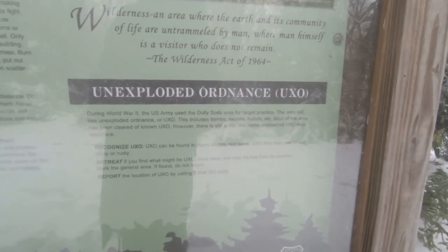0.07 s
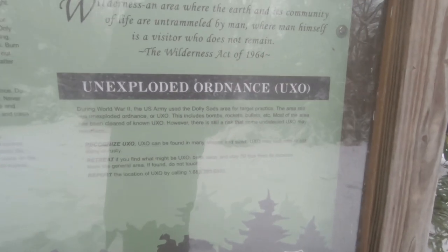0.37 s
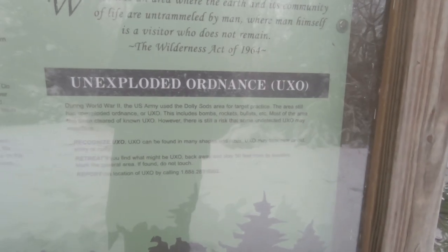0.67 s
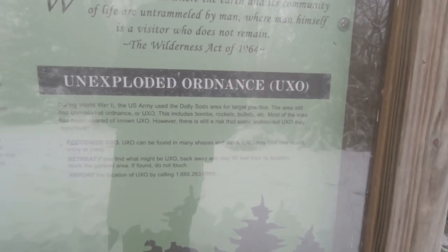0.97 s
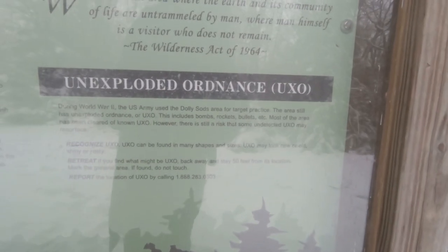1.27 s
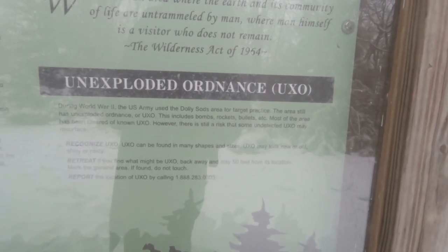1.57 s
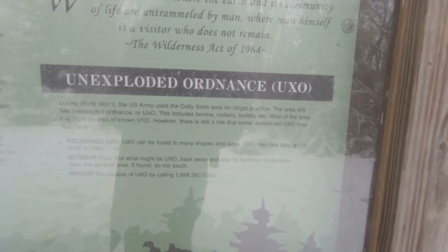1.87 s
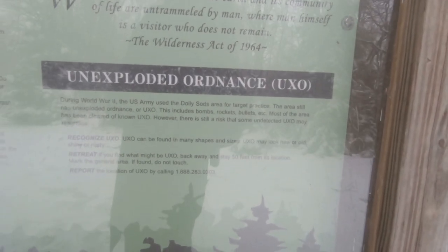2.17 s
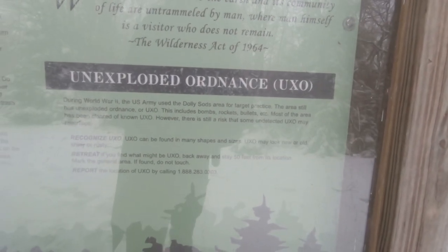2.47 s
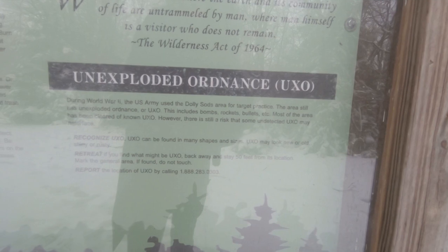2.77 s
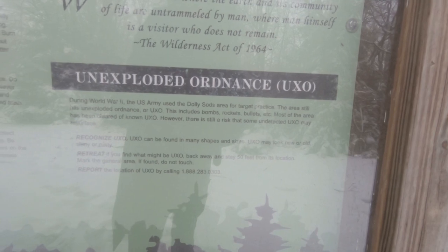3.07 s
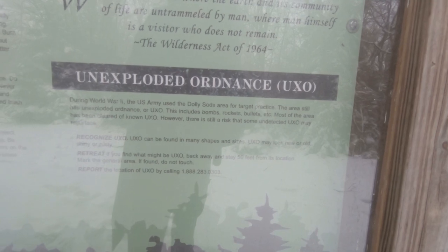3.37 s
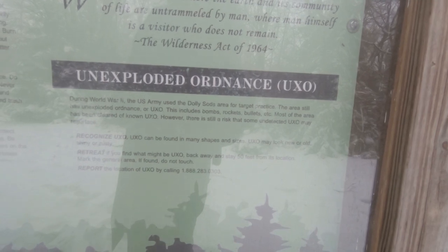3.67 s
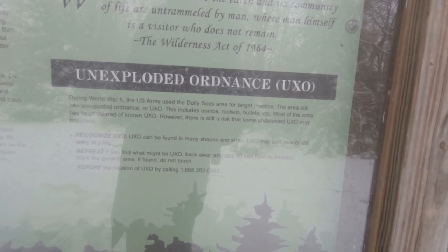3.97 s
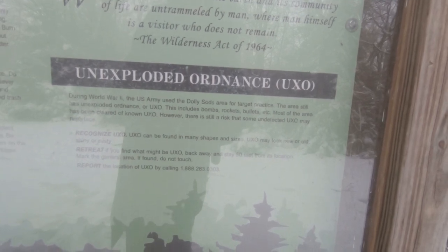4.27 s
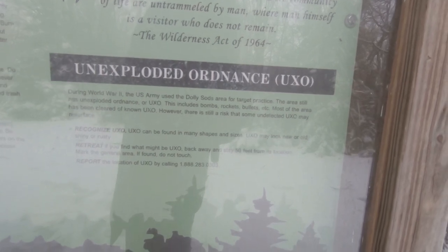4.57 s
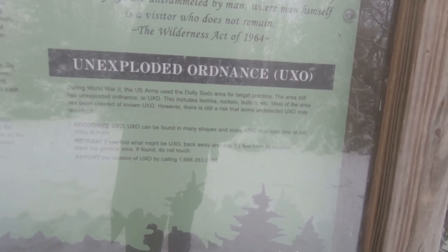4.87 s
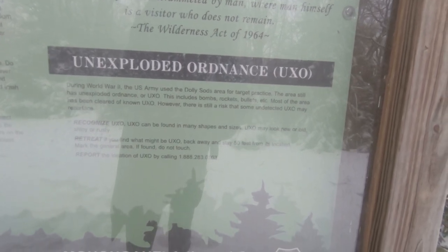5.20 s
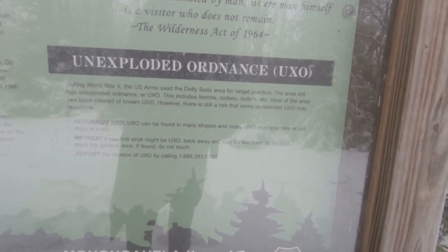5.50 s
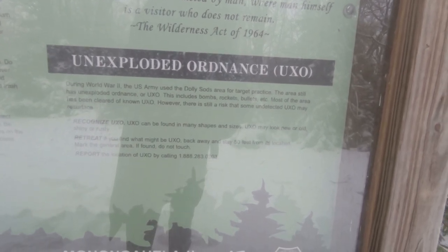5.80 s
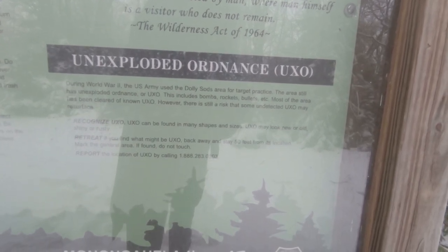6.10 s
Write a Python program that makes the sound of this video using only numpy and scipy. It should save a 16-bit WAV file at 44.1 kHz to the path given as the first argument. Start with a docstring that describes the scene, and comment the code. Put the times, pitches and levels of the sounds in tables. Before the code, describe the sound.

From the start, a faint low roar of wind comes from a distant forest, branches hiss softly ahead, and fine freezing rain patters all around. A brief gust rumbles on the microphone right away, and dull close taps sound at about 0.1 and 0.7 seconds. Around 1.5 to 2 seconds the sound widens from mono to stereo. From 2 seconds, uneven gusts thump the microphone, mostly on the right, while nearby ice pellets tick with brittle clicks. A sharper tap comes near 3 seconds. Between 3.5 and 4.2 seconds, several drops splat dryly on a wooden sign at left, as the far roar sinks away. A few more taps follow from 4.6 to 5.3 seconds. At about 5 seconds the strongest gusts arrive, a loud low buffeting over the ticking ice, which holds and then eases around 6 seconds.

```python
"""Wind and light freezing rain at a wooden trail sign, on the two microphone ports of a hand-held camera.
From the start the forest roars far off, branches hiss ahead and ice grains patter all around.
A first gust buffets each port on its own, dull taps sound close by and near pellets tick.
After about 1.4 s the image opens from mono to stereo; from 3.5 s a few drops splat on the sign at left.
The roar sinks away, and near 5 s the strongest gusts rise, hold and die away over a light breeze."""
import sys
import numpy as np
from scipy import signal
from scipy.fft import rfft, irfft, next_fast_len
from scipy.io import wavfile
from scipy.ndimage import uniform_filter1d, map_coordinates

SR = 44100
rng = np.random.default_rng(int(sys.argv[2]) if len(sys.argv) > 2 else 0)


def log_audio(samples):
    """Write samples as a 16-bit WAV file to the path given in sys.argv[1]."""
    # one column per channel
    frames = np.atleast_2d(samples).T
    # limit to full scale, then quantise
    limited = np.clip(frames, -1, 1)
    pcm = np.round(limited * 32767).astype(np.int16)
    wavfile.write(sys.argv[1], SR, pcm)


N = 270774


def amp(db):
    """Decibels to gain."""
    return 10 ** (np.asarray(db) / 20)


def unit(x):
    """Scaled to rms 1."""
    return x / np.sqrt(np.mean(x ** 2) + 1e-20)


def along(points, hz):
    """Gain of (frequency [Hz], level [dB]) points on a log axis."""
    f, db = np.transpose(points)
    return amp(np.interp(np.log(hz + 1), np.log(f + 1), db))


def curve(points):
    """One level per sample from (time [s], level [dB]) points."""
    s, db = np.transpose(points)
    return np.interp(np.arange(N) / SR, s, db)


def wobble(rate):
    """A smooth random curve, rate knots a second."""
    knots = rng.standard_normal(int(N * rate / SR) + 4)
    return map_coordinates(knots, [np.arange(N) * rate / SR])


def filtered(x, response):
    """x times a response of frequency."""
    m = next_fast_len(N + SR // 2)
    return irfft(rfft(x, m) * response(np.fft.rfftfreq(m, 1 / SR)), m)[..., :N]


def rush(spectrum, patchy_db):
    """Coloured noise of rms 1 with patches of random gain in frequency and time."""
    cells = signal.stft(rng.standard_normal(N), nperseg=512)[2]
    patches = uniform_filter1d(rng.standard_normal(cells.shape), size=7, axis=0)
    patches = uniform_filter1d(patches, size=14, axis=1)
    noise = signal.istft(cells * amp(patchy_db * unit(patches)), nperseg=512)[1][:N]
    return unit(filtered(noise, lambda hz: along(spectrum, hz)))


def stereo(mid, side):
    """Left and right from mid and side."""
    return np.array([mid + side, mid - side])


def panned(pan_db):
    """Left and right gains whose powers add to 1."""
    gains = amp(np.array([np.atleast_1d(pan_db), -np.atleast_1d(pan_db)]) / 2)
    return gains / np.linalg.norm(gains, axis=0)


def add(out, s, sound):
    """Mix a short stereo sound in at time s."""
    part = out[:, max(round(s * SR), 0):][:, :sound.shape[1]]
    part += sound[:, :part.shape[1]]


# far roar of the forest: (time [s], level [dB])
ROAR_LEVELS = [(0, -51.5), (0.7, -53.5), (1.3, -49), (2.1, -51), (3.0, -57), (3.8, -59.5), (4.4, -59.5),
               (6.14, -69)]
# its colour: (frequency [Hz], level [dB])
ROAR_SPECTRUM = [(30, -22), (110, -10), (145, 0), (175, 3.5), (215, -4), (280, -10.5), (400, -20.5),
                 (700, -59.5)]
# wind in the branches ahead: (time [s], relative level [dB])
WIND_LEVELS = [(0.1, -54.5), (0.46, -54), (1.01, -55), (1.28, -54), (1.82, -56), (2.02, -57.5), (2.39, -59),
               (3.46, -60.5), (4.16, -59), (4.44, -60), (5.09, -58), (5.4, -61.5), (6.05, -61)]
# hiss of the branches: (frequency [Hz], level [dB])
BRANCH_SPECTRUM = [(150, -3), (350, -3), (700, -1.5), (950, -7.5), (1300, -4.5), (2000, -3), (3200, 0),
                   (4000, -2.5), (4800, -6), (5600, -20.5), (8000, -58), (15000, -70)]
# width of that hiss around the microphone: (frequency [Hz], side gain [dB])
BRANCH_WIDTH = [(350, -15), (750, -2.5), (1500, -3), (2200, -5), (3300, -9), (4500, -11.5)]


def forest():
    """A far low roar and the hiss of wind in the branches ahead; the woods all around stay steady."""
    roar = amp(curve(ROAR_LEVELS) + 0.7 * wobble(5.0)) * rush(ROAR_SPECTRUM, patchy_db=2.0)
    ahead = rush(BRANCH_SPECTRUM, patchy_db=0.94) * amp(curve(WIND_LEVELS) + 1.5 + 0.55 * wobble(23.9))
    around_gain = amp(-57.0 + 0.27 * wobble(3))
    around = filtered(rush(BRANCH_SPECTRUM, patchy_db=1.2), lambda hz: along(BRANCH_WIDTH, hz))
    return stereo(roar + ahead, around_gain * around)


def patter(spectrum, per_s, scatter_db):
    """Tiny ice grains of uneven size, unrelated at the two ports, rms 1."""
    shape = (2, N)
    hits = (rng.random(shape) < per_s / SR) * rng.choice([-1, 1], shape)
    sizes = amp(scatter_db * np.minimum(rng.standard_normal(shape), 2))
    return unit(filtered(hits * sizes, lambda hz: along(spectrum, hz)))


# sleet falling all around: (time [s], relative level [dB])
SLEET_LEVELS = [(0.1, -71), (0.36, -70), (1.61, -69.5), (2.35, -66), (2.5, -64.5), (3.38, -66.5),
                (5.17, -61.5), (5.83, -64.5), (6.05, -64.5)]
# its colour: (frequency [Hz], level [dB])
SLEET_SPECTRUM = [(2000, -17), (4000, -14.5), (5200, 3), (6300, 2.5), (7500, 2.5), (8300, -4), (9300, -11),
                  (10500, -16), (12500, -39), (14800, -59)]
# fine ice fizz on top: (time [s], relative level [dB])
FIZZ_LEVELS = [(0.1, -83), (0.28, -81.5), (1.41, -82.5), (1.54, -85), (2.39, -84.5), (2.53, -83),
               (3.35, -95), (4.24, -92), (5.19, -85.5), (5.77, -94), (6.05, -91)]
# its colour: (frequency [Hz], level [dB])
FIZZ_SPECTRUM = [(5000, -23), (8000, 9.5), (9500, 0), (11300, 2.5), (12800, -2), (13800, -14), (14800, -27)]


def sleet():
    """Far grains merge into a hiss; nearer ones stay a crackle with a fine fizz on top."""
    flurry = wobble(14)
    far = stereo(rush(SLEET_SPECTRUM, patchy_db=1.2), amp(-0.5) * rush(SLEET_SPECTRUM, patchy_db=1.0))
    near = patter(SLEET_SPECTRUM, per_s=180, scatter_db=6.5)
    fizz = stereo(rush(FIZZ_SPECTRUM, patchy_db=2.5), rush(FIZZ_SPECTRUM, patchy_db=1))
    fizz += amp(-6.0) * patter(FIZZ_SPECTRUM, per_s=55, scatter_db=11.0)
    sleet_gain = amp(curve(SLEET_LEVELS) + 0.3 * flurry)
    fizz_gain = amp(curve(FIZZ_LEVELS) + 3.5 + 1.9 * flurry)
    return sleet_gain * (amp(-0.57) * far + amp(-4.5) * near) + fizz_gain * fizz


# rumble of air right on a microphone port: (frequency [Hz], level [dB])
RUMBLE_SPECTRUM = [(10, -27), (25, -3.5), (45, 0), (70, 0), (100, -6), (150, -12.5), (220, -27.5),
                   (320, -44.5), (480, -58.5), (900, -67), (2000, -100)]
# finer flutter at the port: (frequency [Hz], level [dB])
FLUTTER_SPECTRUM = [(60, -16), (130, 2), (220, -0.5), (320, -14), (480, -25.5), (900, -60), (2000, -80)]


def port_turbulence():
    """Lumpy turbulence of rms 1; each pressure peak sheds a burst of finer flutter."""
    swirl = rush(RUMBLE_SPECTRUM, patchy_db=3)
    strength = np.sqrt(np.abs(uniform_filter1d(swirl ** 2, size=SR // 14)))
    lumps = amp(2.6 * wobble(24))
    rumble = unit(swirl / strength * lumps)  # the swirl is evened out, so the lumps set its strength
    flutter = unit(rumble * lumps * rush(FLUTTER_SPECTRUM, patchy_db=-0.5))
    return unit(rumble + amp(-23.0) * flutter)


def gust(start, hold):
    """Power envelope of one gust: a quick rise, a hold and a slower release."""
    attack_s, release_s = 0.065, 0.099  # per 20 dB
    t = np.arange(N) / SR - start
    edges = np.maximum(-t, 0) / attack_s + np.maximum(t - hold, 0) / release_s
    return amp(-20 * edges) ** 2


# gusts on the microphone: (time [s], hold [s], level [dB], left minus right [dB])
PORT_GUSTS = [(0.06, 0.22, -38.5, 3.5), (1.383, 0.054, -55, 4), (1.706, 0.62, -45, -6),
              (1.9, 0.15, -29.5, -13), (2.34, 0.26, -34, -17), (2.605, 0.17, -38.5, 0),
              (2.919, 0.12, -30, -5.5), (3.018, 0.19, -38, -7), (3.309, 0.12, -40.5, -11),
              (3.588, 0.042, -37, -8), (3.933, 0.11, -45.5, -1), (4.288, 0.1, -44, -18),
              (4.505, 0.163, -41, -6), (4.687, 0.02, -28.5, 7), (4.8, 0.16, -37.5, -3),
              (4.986, 0.17, -22, 4), (5.21, 0.4, -23, 2), (5.569, 0.44, -25.5, 5.5),
              (6.058, 0.054, -35.5, 1)]
# single eddies that hit a port: (time [s], level [dB], left minus right [dB], half length [s])
PORT_EDDIES = [(0.18, -31, 0, 0.0031), (2.004, -29.5, 18, 0.0014), (2.044, -19.5, -24, 0.0023),
               (2.926, -20.5, -26, 0.0021), (3.014, -23, -19, 0.0044), (3.34, -26.5, -19, 0.0029),
               (4.51, -26.5, -24, 0.004), (4.705, -22, 22, 0.0019), (4.97, -18, 17, 0.0019),
               (5.016, -9, 12, 0.0036), (5.046, -21, 26, 0.0011), (5.138, -18, 29, 0.0015),
               (6.002, -16.5, 19, 0.0021)]


def buffeting():
    """Gusts pile onto a light breeze, each port with its own turbulence; an eddy adds one short push."""
    wind_db = curve(WIND_LEVELS)
    breeze = amp(-62.5 + 1.38 * (wind_db - wind_db.mean()))  # follows the wind in the branches
    gust_power = sum((amp(db) * panned(pan_db)) ** 2 * gust(s, hold) for s, hold, db, pan_db in PORT_GUSTS)
    out = np.array([port_turbulence(), port_turbulence()]) * np.sqrt(breeze ** 2 + gust_power)
    t = np.arange(SR // 10) / SR
    for s, db, pan_db, half_s in PORT_EDDIES:
        u = (t - t.mean()) / half_s
        push = (u * u - 1) * np.exp(-u * u / 2)
        add(out, s - t.mean(), amp(db) * panned(pan_db) * push)
    return out


# what a tap rings with: (frequency [multiple of the lowest mode], level [dB], t60 [s])
RING_MODES = [(1, -2, 0.029), (1.4, -4, 0.031), (2.08, -1.5, 0.027), (2.8, -9.5, 0.024), (4, -6, 0.01),
              (5.6, -17.5, 0.012), (8.3, -15, 0.011)]


def struck(base_hz, bright_db, crack):
    """One blow of peak 1: damped modes at random strengths, tilted per octave, and a short crack."""
    t = np.arange(SR // 10) / SR
    ring = np.zeros(len(t))
    for ratio, db, t60 in RING_MODES:
        strength = rng.choice([-1, 1]) * amp(db + bright_db * np.log2(ratio) + rng.normal(0, 1.5))
        ring += strength * amp(-60 * t / t60) * np.sin(2 * np.pi * ratio * base_hz * t)
    blow = ring / np.abs(ring).max() + crack * amp(-60 * t / 0.056) * rng.standard_normal(len(t))
    return blow / np.abs(blow).max()


# dull taps close to the microphone:
# (time [s], relative level [dB], lowest mode [Hz], brightness [dB/octave], left minus right [dB])
CLOSE_TAPS = [(0.134, -36.5, 455, -7, 0), (0.729, -34.5, 465, 2.5, 0), (2.340, -42.5, 640, 3, 5),
              (2.968, -27.5, 588, 1, 6), (3.023, -41.5, 594, 3, 4), (4.611, -35, 730, 6, 10),
              (4.998, -36.5, 674, -5, 11), (5.297, -30.5, 740, -4, 10)]


def taps():
    """Close taps with a faint rebound; soft contact leaves little treble."""
    out = np.zeros((2, N))
    for s, db, base_hz, bright_db, pan_db in CLOSE_TAPS:
        add(out, s, amp(db) * panned(pan_db) * struck(base_hz, bright_db, crack=0.29))
        add(out, s + 0.008, amp(db - 12) * panned(pan_db) * struck(base_hz, bright_db, crack=0.17))
    soft_contact = [(4000, 2.5), (8000, -9), (11000, -21), (14500, -24)]  # (frequency [Hz], gain [dB])
    return filtered(out, lambda hz: along(soft_contact, hz))


def burst(spectrum, t60):
    """A dry splash of coloured noise with peak 1."""
    t = np.arange(SR // 20) / SR
    colour = along(spectrum, np.fft.rfftfreq(len(t), 1 / SR))
    noise = irfft(rfft(rng.standard_normal(len(t))) * colour, len(t))
    splash = noise * amp(-60 * t / t60) * (1 - np.exp(-t / 0.00043))
    return splash / np.abs(splash).max()


def stray_pellets(per_s=4.0, scatter_db=4):
    """Weaker pellets at random, as strong as the sleet allows: (time [s], relative level [dB])."""
    loudest_db = curve(SLEET_LEVELS) + 13
    draws = rng.random((int(per_s * N / SR), 2))
    return [(when * N / SR, loudest_db[int(when * N)] - scatter_db * weakness) for when, weakness in draws]


# the loudest ice pellets landing near the microphone: (time [s], relative level [dB])
NEAR_PELLETS = [(1.104, -53), (2.23, -52.5), (2.337, -50), (2.3887, -48), (2.4493, -46.5), (2.5507, -48.5),
                (2.603, -49), (2.638, -52), (2.714, -50), (2.775, -49), (2.859, -47.5), (3.1056, -49),
                (3.862, -53), (4.6319, -49), (5.298, -51), (5.3363, -48.5), (5.507, -48), (5.8537, -50)]
# their brittle click: (frequency [Hz], level [dB])
CLICK_SPECTRUM = [(1500, -15), (4000, 3), (6000, 3.5), (7800, 5), (9000, -8.5), (11000, -15), (13000, -22),
                  (14800, -18)]


def pellets():
    """Each near pellet is a brittle click with a brief ring, then a weaker skip."""
    out, t = np.zeros((2, N)), np.arange(SR // 20) / SR
    for s, db in NEAR_PELLETS + stray_pellets():
        ring_hz = 7340 * np.exp(0.095 * rng.standard_normal())
        ring = 0.26 * np.sin(2 * np.pi * ring_hz * t) * amp(-60 * t / 0.015)
        click = np.array([burst(CLICK_SPECTRUM, t60=0.02), burst(CLICK_SPECTRUM, t60=0.016)])
        place = panned(rng.normal(-2.5, 2.8))  # mostly a little to the right
        add(out, s, amp(db + 8.5) * place * (ring + click))
        skip_s = s + rng.uniform(0.008, 0.035)
        add(out, skip_s, amp(db - 1) * place * burst(CLICK_SPECTRUM, t60=0.01))
    return out


# drops on the sign, left of the microphone: (time [s], relative level [dB])
SIGN_DROPS = [(3.4544, -52), (3.5252, -46.5), (3.742, -46.5), (3.8188, -41.5), (3.9703, -42.5),
              (4.0789, -41), (4.2084, -46.5)]
# their splat: (frequency [Hz], level [dB])
SPLAT_SPECTRUM = [(500, -16), (1100, -4), (1500, 6.5), (2600, 0), (3800, 3.5), (5000, -8.5), (7000, -7),
                  (14000, -57)]


def drops():
    """Drops splat on the wooden sign without ringing."""
    out = np.zeros((2, N))
    for s, db in SIGN_DROPS:
        add(out, s, amp(db + 5.5) * panned(13) * burst(SPLAT_SPECTRUM, t60=0.04))
    return out


def scene():
    """Everything that reaches the two microphone ports."""
    return buffeting() + forest() + sleet() + taps() + pellets() + drops()


def record(dry):
    """The camera's image starts mono and widens evenly; the treble falls steeply at the band limit."""
    mono_until_s, opening_s, top_hz = 1.42, 0.71, 14800
    left, right = dry
    width = np.clip((np.arange(N) / SR - mono_until_s) / opening_s, 0, 1)
    image = stereo((left + right) / 2, width * (left - right) / 2)
    return filtered(image, lambda hz: np.clip((top_hz - hz) / 1200, 0, 1))


dry = scene()
out = record(dry)
log_audio(out)
```